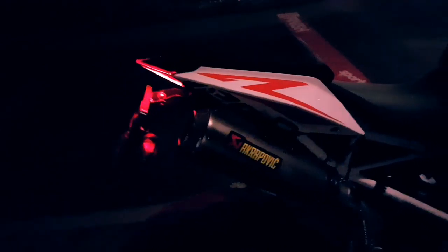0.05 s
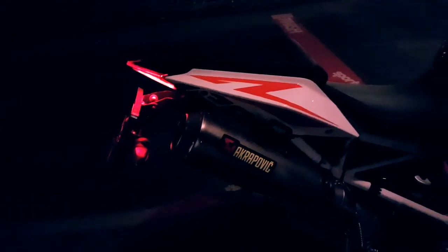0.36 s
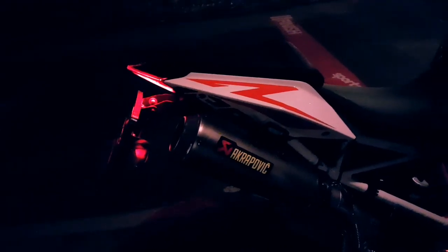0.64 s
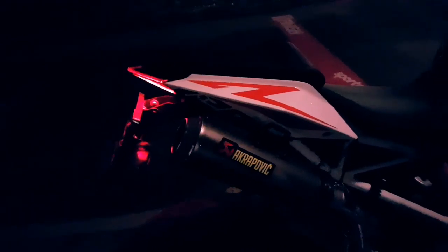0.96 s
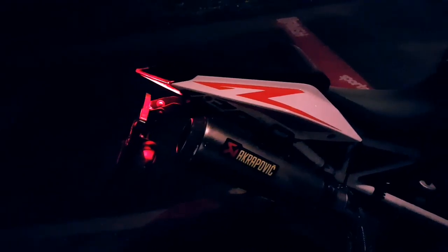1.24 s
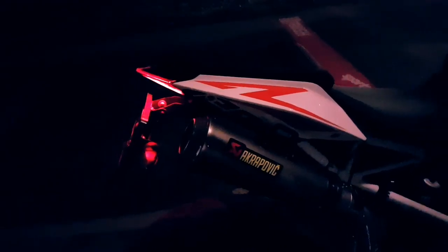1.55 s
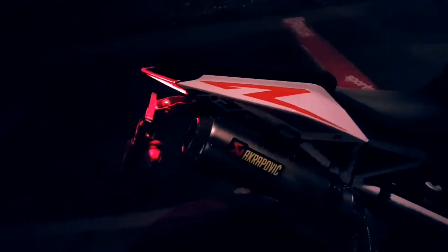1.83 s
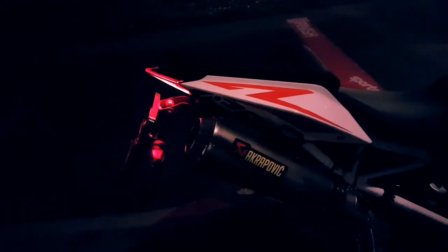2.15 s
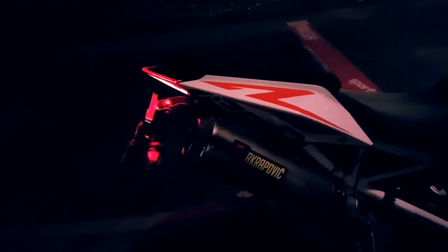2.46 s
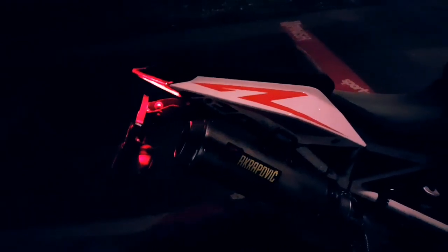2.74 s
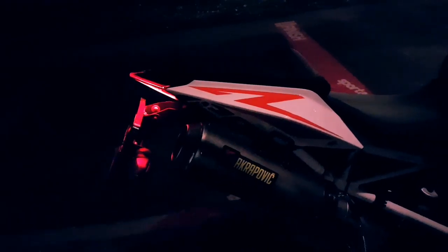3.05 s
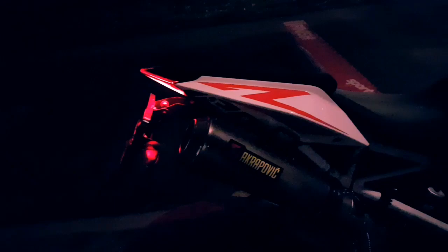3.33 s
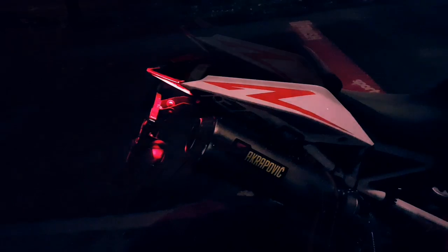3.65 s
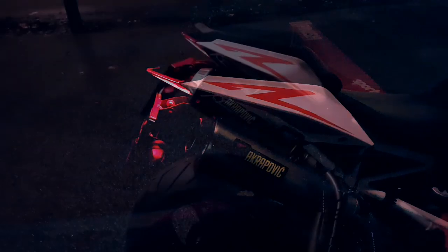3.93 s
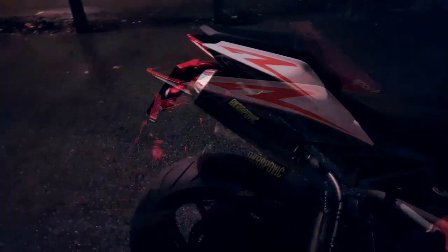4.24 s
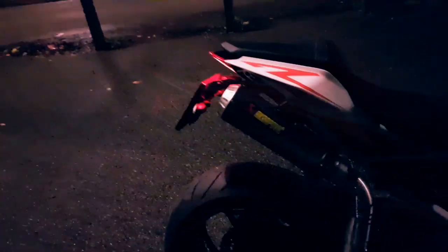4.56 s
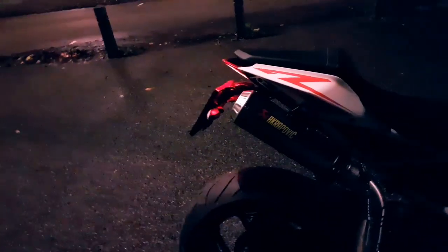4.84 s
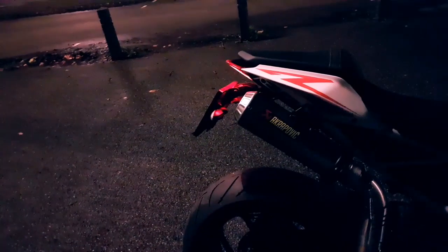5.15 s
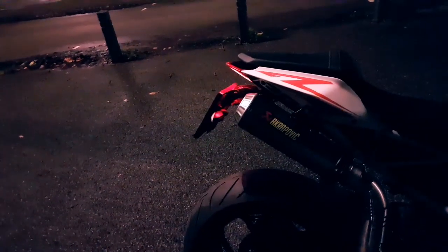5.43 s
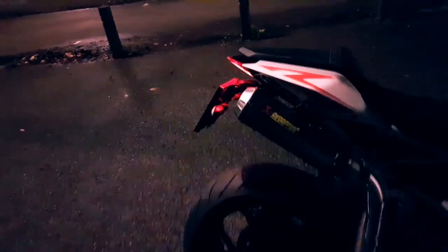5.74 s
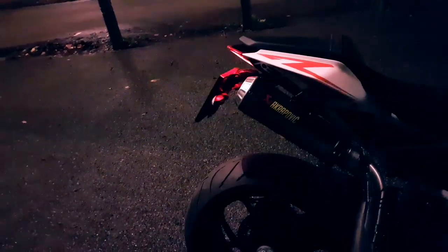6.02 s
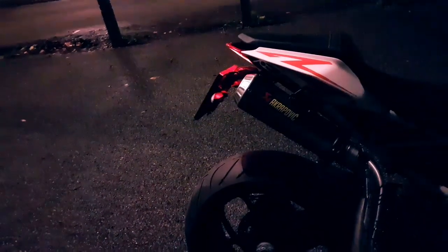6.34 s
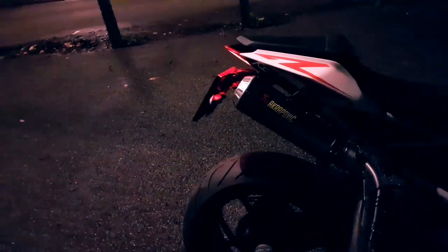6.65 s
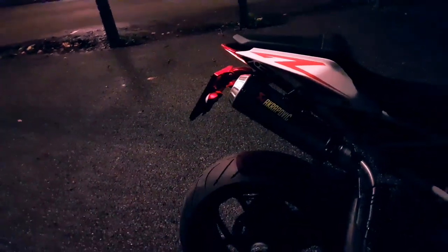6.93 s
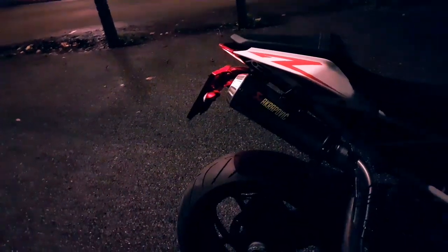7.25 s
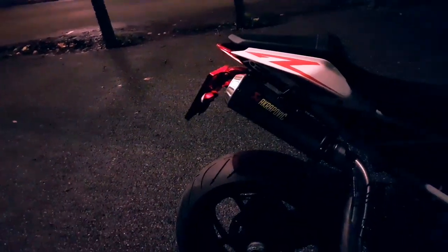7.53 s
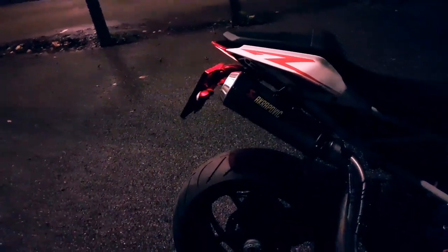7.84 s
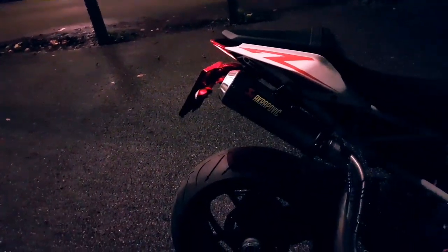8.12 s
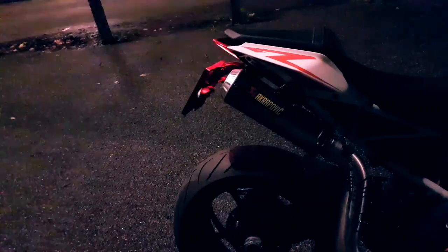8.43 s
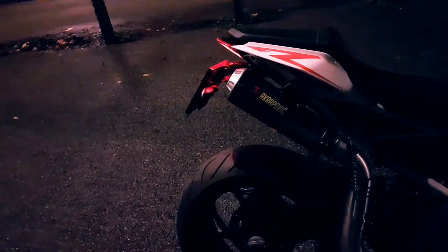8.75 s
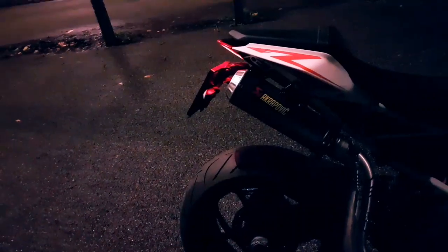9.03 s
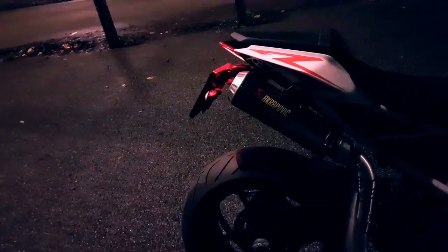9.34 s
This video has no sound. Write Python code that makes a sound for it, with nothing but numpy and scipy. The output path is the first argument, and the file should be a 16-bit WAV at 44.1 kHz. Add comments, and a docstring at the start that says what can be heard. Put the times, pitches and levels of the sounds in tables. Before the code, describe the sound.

Close outdoors, a motorcycle engine barks through repeated throttle blips, popping and thudding as it winds down between them.

```python
"""A parked motorcycle thuds at a lumpy idle and is at once blipped, nine times in all, outdoors and close by.
Four unevenly spaced exhaust pulses a cycle excite resonances that boom in the pipe and bark in the
silencer, while the turbulent gas jet rasps as the throttle opens. The engine sinks back with afterfire
pops, faint gear whine and valve clatter. Midway the microphone moves from beside the silencer to above
it. The recorder squashes the peaks."""
import sys
import numpy as np
from scipy import signal
from scipy.fft import rfft, irfft, next_fast_len
from scipy.io import wavfile
from scipy.ndimage import uniform_filter1d

SR = 44100
rng = np.random.default_rng(int(sys.argv[2]) if len(sys.argv) > 2 else 0)


def to_wav(s):
    """Save 16-bit WAV."""
    ch = np.atleast_2d(s).T  # columns
    pcm = np.round(np.clip(ch, -1, 1) * 32767)  # PCM
    wavfile.write(sys.argv[1], SR, pcm.astype(np.int16))


N = 418068
T = np.arange(N) / SR
MOVE_S = (4.3, 3.8)  # the microphone's change of position falls between these times


def undb(db):
    """Decibels to amplitude ratio."""
    return 10 ** (np.asarray(db) / 20)


def clicks(times, sizes):
    """Impulse train: linear interpolation shares each impulse between two neighbouring samples."""
    at = np.clip(times * SR, 0, N - 2)
    i = at.astype(int)
    return np.bincount(i, sizes * (1 - at + i), N) + np.bincount(i + 1, sizes * (at - i), N)


def butter(x, hz, kind, order=2):
    """Butterworth low-pass or high-pass."""
    return signal.sosfilt(signal.butter(order, hz, kind, fs=SR, output="sos"), x + 1e-18)


def zero_phase_low(x, hz, order):
    """Low-pass run forward and backward, so that its phase shifts cancel."""
    return signal.sosfiltfilt(signal.butter(order, hz, fs=SR, output="sos"), x)


def ring(x, modes):
    """Modal superposition: a sum of resonances, each a frequency in Hz, bandwidth in Hz and gain in dB."""
    return sum(undb(db) * signal.lfilter(*signal.iirpeak(hz, hz / width, fs=SR), x + 1e-18)
               for hz, width, db in modes)


def fade(x, seconds):
    """Exponential decay: every impulse gains a tail with this time constant."""
    return signal.lfilter([1], [1, -np.exp(-1 / (seconds * SR))], x + 1e-18)


def steady(x, seconds=0.16):
    """Normalisation to a running rms of 1, slow enough to keep single beats."""
    size = int(seconds * SR)
    power = uniform_filter1d(uniform_filter1d(np.atleast_2d(x ** 2).mean(0), size), size // 2)
    return x / np.sqrt(np.abs(power) + 1e-12)


def wander(hz):
    """Random fluctuation: low-passed noise with a standard deviation of 1."""
    slow = butter(rng.standard_normal(N // 16 + 2), 16 * hz, "low")
    return np.interp(np.arange(N) / 16, np.arange(len(slow)), slow / slow.std())


def scatter(x, t60, dull_hz):
    """Diffuse reflection: convolution with a decaying noise tail, different in each channel."""
    t = T[:SR]
    tail = butter(rng.standard_normal((2, SR)), dull_hz, "low", order=1)
    tail *= undb(-60 * t / t60) * (1 - np.exp(-t / (t60 / 20)))
    tail /= np.sqrt((tail ** 2).sum(1, keepdims=True) * SR / (np.pi * dull_hz))
    return signal.fftconvolve(np.atleast_2d(x), tail, axes=1)[:, :N]


def sway(x, sway_s=.0005, sway_hz=2.):
    """Varying path delay: reflections arrive earlier and later as the hand-held microphone moves."""
    return np.array([np.interp(T + sway_s * wander(sway_hz), T, channel) for channel in x])


# Glides of the gear whine. Each row: start and end in seconds, first and last pitch in Hz, level in dB.
GEAR_GLIDES = [(0, .16, 5300, 4500, -52), (.68, .87, 5800, 4400, -51), (1.3, 1.5, 6600, 5100, -52),
               (2.02, 2.43, 6500, 4300, -51), (3.3, 3.66, 6400, 4700, -49.5)]
# Tones of the gear train. Each row: frequency ratio to the main whine, relative level in dB.
GEAR_TONES = [(1, 3), (.76, -1.5), (.58, -5), (1.17, -7)]

def gears(waver=.02, waver_hz=180, flutter_db=8, flutter_hz=32):
    """Mesh tones fall as the gears slow; the uneven crank modulates each into rough chirps."""
    hz, gain = np.zeros((2, N))
    for start, end, high_hz, low_hz, db in GEAR_GLIDES:
        on = (T >= start) & (T < end)
        progress = (T[on] - start) / (end - start)
        hz[on] = high_hz + (low_hz - high_hz) * progress
        gain[on] = undb(db) * np.sqrt(np.sin(np.pi * progress))
    whine = 0
    for ratio, db in GEAR_TONES:
        phase = 2 * np.pi * np.cumsum(ratio * hz * (1 + waver * wander(waver_hz))) / SR
        contact = undb(db + flutter_db * np.clip(wander(flutter_hz), -2, 1))
        whine = whine + contact * np.sin([phase, phase + wander(flutter_hz)])
    return gain * whine


# Modes of the engine cases. Each row: frequency in Hz, bandwidth in Hz, gain in dB.
CASE_MODES = [(1560, 60, -1), (2080, 50, 0), (2480, 60, -1), (3000, 48, -1), (3700, 70, -3), (4400, 60, -4),
              (5700, 55, -5)]

def clatter(level_db=-47, uneven_db=6):
    """Impact excitation: each uneven knock of valves and chain rings the cases in its own mix of modes."""
    cycles = np.cumsum(engine()[0]) / SR
    at = np.arange(0, cycles[-1], 1 / 4)
    times = np.interp(at + rng.random(len(at)) / 4, cycles, T)
    count = len(CASE_MODES)
    strengths = undb(uneven_db * np.clip(rng.standard_normal((count, len(at))), -2, 2))
    knocks = [ring(clicks(times, sizes), [mode]) for sizes, mode in zip(strengths, CASE_MODES)]
    stereo_mix = rng.standard_normal((2, count)) / 3 + np.array([np.ones(count), (-1) ** np.arange(count)])
    return undb(level_db) * steady(stereo_mix @ np.array(knocks))


def detuned(x, modes, depth=.035, drift_hz=9):
    """Sound speed depends on temperature: hot and cool slugs of gas make the resonances drift in pitch."""
    tune = 1 + depth * np.clip(wander(drift_hz), -2, 2)
    clock = np.cumsum(tune / tune.mean()) / SR
    return np.interp(clock, T, ring(np.interp(T, clock, x), modes))


# Full idle beats that stand out. Each row: time in seconds, relative boom in dB, relative honk in dB.
IDLE_THUMPS = [(0.023, -6, -22), (0.155, 1.5, -17), (0.555, -0.5, -12), (0.652, -1, -18), (0.69, 5, -9.5),
               (0.759, -8, -29), (1.32, -1, -10), (1.408, -3, -18), (2.062, -3.0, -13), (2.2, 2, -14),
               (2.291, -3.0, -22), (2.331, -6, -25), (3.28, -2, -14), (3.318, 1.5, -8), (3.376, -7, -20),
               (3.417, 0, -12.5), (3.469, -4, -22), (3.496, -2, -23), (3.554, -1, -15), (3.741, -7, -27),
               (3.828, -8, -28), (3.971, -6, -24), (3.998, -1, -24), (4.024, 1.5, -16), (4.691, 1, -12),
               (4.731, -6.0, -13.5), (4.774, -2, -18.0), (4.879, -6, -21.0), (4.97, -3.0, -19),
               (5.081, -4.5, -26), (6.189, 5, -8.5), (6.21, -14, -26), (6.254, -2, -16), (7.36, -7, -14),
               (7.4, -1.5, -15), (7.441, 0, -17), (7.548, -7.0, -20), (7.654, -8, -35), (7.683, -2, -21),
               (7.705, 3.5, -12), (8.601, -2, -8), (8.717, -5.0, -14), (8.88, -2, -18), (8.911, -1, -10)]

def thumps(honk_db=2, soft_hz=480, honk_top_hz=750):
    """Impulse response to a full firing: a rounded boom in the pipe, a honk in chamber and silencer."""
    times, booms_db, honks_db = np.transpose(IDLE_THUMPS)
    impulse = clicks(T[:1], np.ones(1))
    modes = CHAMBER_MODES + SILENCER_ABOVE_MODES[:2]
    pipe_ring = lambda x: butter(ring(x, FAST_PIPE_MODES[1:] + SLOW_PIPE_MODES[1:]), soft_hz, "low")
    honk_band = lambda x: butter(butter(x, honk_top_hz, "low", order=4), 300, "high")
    boom = pipe_ring(clicks(times, -undb(booms_db))) / np.abs(pipe_ring(impulse)).max()
    honk = honk_band(detuned(clicks(times, -undb(honks_db)), modes))
    return boom + undb(honk_db) * honk / np.abs(honk_band(ring(impulse, modes))).max()


# Afterfire and hard single firings. Each row: time in seconds, relative crack and thump levels in dB.
AFTERFIRE = [(0.2209, -4, 8.5), (0.2633, 0, 7), (0.88, -26, 5), (0.902, -2.5, 7.5), (0.927, -1, 8),
             (0.944, -5, -20), (1.0698, -14, 1), (1.366, -12, 4.5), (1.5111, -2, 6.5), (1.664, -10.5, 5),
             (2.103, -35, 3.5), (2.125, -26.5, -2), (2.477, -34, 0), (2.5005, -12.5, 5), (2.533, -13, 7),
             (2.578, -13, 8), (3.245, -40, -8), (3.263, -33, -6), (3.305, -37, -1), (3.598, -26, 4),
             (3.619, -18, 10), (3.651, -17, 8.5), (3.694, -14.5, 5.5), (4.059, -19, -1), (4.083, -17, 3.5),
             (4.114, -18, -7), (4.136, -14.5, -1), (4.206, -20, -5), (4.28, -11, -1), (4.6257, -10, 5),
             (4.794, -14.5, 1.5), (4.8177, -15, -5), (5.108, -21, 3.5), (5.138, -17.5, -1), (6.06, -21, -1),
             (6.1653, -13, 2), (6.288, -24, -1), (6.31, -35, -12), (6.332, -13.5, 0), (6.625, -1, -5),
             (6.641, -2.5, 4), (7.2555, -5.5, 5), (7.266, -9, 0), (7.301, -7.5, -6), (7.7311, -13, 6),
             (8.545, 1, 3), (8.641, -19.5, -1), (8.9558, -12.5, 5), (9.279, -3, 7)]

def pops(crack_s=.0055, crack_db=-1, bark_db=2, thump_db=-1, crack_hz=3300, bite_db=-3):
    """Sudden combustion in the pipe: a crack of gas, a ring of chamber and silencer, and a low thump."""
    times, cracks_db, thumps_db = np.transpose(AFTERFIRE)
    bangs = clicks(times, undb(cracks_db))
    impulse = clicks(T[:1], np.ones(1))
    gas = fade(bangs, crack_s) * jet_noise()
    bite = ring(gas, [(2100, 1400, -2)])  # broad resonance of the tailpipe mouth
    crack = butter(gas + undb(bite_db) * bite, crack_hz, "low", order=1)
    body = lambda x: butter(ring(x, CHAMBER_MODES + SILENCER_ABOVE_MODES), 960, "low")
    bark = body(-bangs) / np.abs(body(impulse)).max()
    thump = butter(ring(clicks(times, -undb(thumps_db)), SLOW_PIPE_MODES), 900, "low", order=3)
    thump /= np.abs(ring(impulse, SLOW_PIPE_MODES)).max()
    return undb(crack_db) * crack + undb(bark_db) * bark + undb(thump_db) * thump


# Throttle blips. Each row: opening and shutting in seconds, top speed in cycles per second, run-down
# rate per second, then trims in dB for bark while open, rasp while open and bark while coasting.
BLIPS = [(.218, 0.31, 39.5, 2.36, 13.5, 14.5, -1.5), (.915, 1.03, 44.9, 2.34, 11, 14, -1.5),
         (1.508, 1.629, 52, 2.26, 10, 12.5, -2), (2.473, 2.83, 56.9, 2.08, 1, -3, -2.5),
         (3.989, 4.379, 43, 1.754, 1.5, -2.5, -3), (5.089, 5.419, 58.5, 1.56, 3.5, 0, -3.5),
         (6.265, 6.599, 81.4, 1.49, 3, 0, -3), (7.689, 8.0, 67.2, 1.56, 2.5, -1, -3.5),
         (8.901, 9.24, 76.2, 1.43, 2, -2, -2.5)]

def engine(idle_hz=11.2, climb_power=1.3, hang_s=.045, open_s=0.014, shut_s=0.039, shut_lag_s=0.002):
    """Rotational inertia: speed climbs under throttle, hangs, then decays exponentially towards idle."""
    speed, throttle, trim_db = np.full(N, idle_hz), np.zeros(N), np.zeros((3, N))
    for opens, shuts, top, fall, *trim in BLIPS:
        after = T >= opens
        t, start = T[after], np.interp(opens, T, speed)
        climb = start + (top - start) * ((t - opens) / (shuts - opens)) ** climb_power
        free = top * np.exp(-fall * np.maximum(t - shuts - hang_s, 0))
        run_down = np.sqrt(np.hypot(free ** 2, idle_hz ** 2))
        speed[after] = np.where(t < shuts, climb, run_down)
        opening = np.clip((t - opens) / open_s, 0, 1)
        throttle[after] = opening * np.clip((shuts + shut_lag_s - t) / shut_s, 0, 1)
        trim_db[:, after] = np.array(trim)[:, None]
    return speed, throttle, trim_db


def by_speed(table, speed):
    """Linear interpolation of a table's columns at the engine's speed."""
    hz, *columns = np.transpose(table)
    return np.array([np.interp(speed, hz, column) for column in columns])


# Exhaust, throttle shut. Each row: speed in cycles per second, relative boom, bark and rasp in dB.
SHUT_LEVELS = [(11.6, -12.5, -33, -40.5), (15.6, -14.5, -29.5, -41), (20.7, -14, -26.5, -36),
               (31.4, -10.5, -23, -35.5), (45, -6, -13, -26), (51.7, -7, -15, -27.5),
               (63.8, -10, -7, -20.5), (84.97, -13.5, -7.5, -19)]
# Exhaust, throttle open. Each row: speed in cycles per second, relative boom, bark and rasp in dB.
OPEN_LEVELS = [(12, -12.5, -23, -35.5), (20.8, -9, -23.5, -33.5), (38.5, -7.5, -14.5, -25),
               (51.3, -13, -13.5, -19), (68.4, -16.5, -8.5, -15), (85, -17, -22, -7)]

def effort(speed, throttle, trim_db, burble_hz=7, burble_db=3, above_rasp_db=0.5):
    """Source strength follows speed and load; coasting slowly, the bark fluctuates in a burble."""
    bark_db, rasp_db, coast_db = trim_db
    burble = burble_db * np.clip(wander(burble_hz), -2, 1) * np.clip((40 - speed) / 15, 0, 1)
    shut = by_speed(SHUT_LEVELS, speed) + np.outer([0, 1, 0], coast_db + burble)
    thinning_db = -0.62 * rasp_db  # a hard pull thins the bass
    wide = by_speed(OPEN_LEVELS, speed) + np.array([thinning_db, bark_db, rasp_db])
    boom, bark, rasp = (1 - throttle) * shut + throttle * wide
    return undb(boom), undb(bark), undb(rasp + above_rasp_db * np.interp(T, MOVE_S, [0, 1]))


# Pulses of one four-stroke cycle. Each row: place as a fraction of the cycle, size in dB,
# size of the steep front in dB, lag of that front in seconds.
CYCLE_PULSES = [(0, -4, -7, .0007), (.24, -.5, .5, .0003), (.46, -4, -6, .0002), (.665, .5, .5, 0)]

def firings(speed, run_db=1.5, idle_db=1.0, load_db=0.7,
            run_jitter=0.004, idle_jitter=0.015, load_jitter=0.022):
    """Quasi-periodic excitation: pulses and their fronts scatter most at idle and under load."""
    cycles = np.cumsum(speed) / SR
    place, size_db, front_db, lag = np.tile(np.transpose(CYCLE_PULSES), int(cycles[-1]) + 1)
    at = np.arange(len(place)) // len(CYCLE_PULSES) + place
    time_draw, size_draw, front_draw = np.clip(rng.standard_normal((len(at), 3)).T, -2, 2)
    idle = np.interp(at, cycles, np.clip((34 - speed) / 8, 0, 1))
    load = np.interp(at, cycles, np.clip(np.gradient(speed) * SR / 150, 0, 1))  # while speed climbs
    times = np.interp(at + time_draw * (run_jitter + idle * idle_jitter + load * load_jitter), cycles, T)
    size = undb(size_db + size_draw * (run_db + idle * idle_db + load * load_db)) * (at < cycles[-1])
    return clicks(times, -size), clicks(times + lag, -size * undb(front_db + front_draw))


# Weak or missed firings. Each row: centre in seconds, length in seconds, level change in dB.
MISFIRES = [(0.14, 0.038, -5.5), (.848, 0.11, -6.5), (1.501, 0.005, -11), (2.261, 0.057, -10.5),
            (5.055, 0.084, -3), (6.69, 0.06, 0), (8.85, 0.042, 0.5)]

def stumbles(pop_s=0.015, pop_db=-5, cut_after_s=0.034, cut_s=0.029, cut_db=-4, thump_s=0.025, thump_db=-6):
    """Amplitude modulation: dips at misfires, at pops and thumps, and just after the throttle shuts."""
    dips = list(MISFIRES) + [(s - pop_s / 4, pop_s, pop_db) for s, *_ in AFTERFIRE]
    dips += [(shuts + cut_after_s, cut_s, cut_db) for _, shuts, *_ in BLIPS]
    dips += [(s, thump_s, thump_db) for s, *_ in IDLE_THUMPS]
    t = T[::40]
    gain_db = sum(db * np.exp(-(2 * (t - s) / length) ** 4) for s, length, db in dips)
    return undb(np.interp(T, t, gain_db))


# Spectrum of the gas jet at the outlet. Each row: frequency in Hz, relative spectral density in dB.
JET_SPECTRUM = [(300, -43), (900, 3.5), (2200, -4), (3200, -9), (5000, -11.5), (7400, -10.5), (9200, -23),
                (12500, -19.5), (15000, -49)]

def jet_colour(x):
    """Spectral shaping: gives a sound the colour of the gas jet, at rms 1."""
    hz, db = np.transpose(JET_SPECTRUM)
    size = next_fast_len(N)
    gain = undb(np.interp(np.log(np.fft.rfftfreq(size, 1 / SR) + 1), np.log(hz), db))
    shaped = irfft(rfft(x, size) * gain, size)[:, :N]
    return shaped / shaped.std()


def jet_noise(shared_power=0.14):
    """Turbulence at the outlet radiates broadband noise, partly coherent between the channels."""
    return jet_colour(rng.standard_normal((2, N)) + np.sqrt(shared_power) * rng.standard_normal(N))


def snarl(fronts, t60=.026, low_hz=1400, high_hz=3400):
    """Nonlinear emphasis: the hardest fronts break into short, ragged bursts at the outlet."""
    burst = sway(scatter(-fronts * np.sqrt(np.abs(fronts)), t60, high_hz))
    return steady(butter(butter(burst, low_hz, "high"), high_hz, "low", order=3))


def gas_rasp(fronts, note, speed, level, gain_db=3.0, hiss=0.26, puff_s=0.03, surge=0.038, shock_db=-2,
             ragged_db=1.38, ragged_hz=45, treble_pivot_db=-29, treble_power=0.3):
    """Pulsed jet noise: each front throws out a puff of gas, and fast pulses steepen into shocks."""
    fast = np.clip((speed - 20) / 30, 0, 1)
    outflow = surge * fast * np.maximum(-steady(note), 0) ** 2  # gas tears out with each swing of the note
    puffs = steady((steady(fade(-fronts, puff_s)) + hiss + outflow) * jet_noise())
    shocks = fast * steady(jet_colour(sway(scatter(fronts, t60=.04, dull_hz=18000))))
    ragged = undb(ragged_db * np.clip(wander(ragged_hz), -2, 2))  # the jet tears unevenly
    rasp = undb(gain_db) * ragged * level * steady(puffs + undb(shock_db) * shocks + fast * snarl(fronts))
    # the top treble of the hiss dulls in quiet moments and opens in loud ones
    dull = zero_phase_low(rasp, 8800, order=4)
    return dull + (rasp - dull) * (level / undb(treble_pivot_db)) ** treble_power


# Modes of the silencer chamber. Each row: frequency in Hz, bandwidth in Hz, gain in dB.
CHAMBER_MODES = [(404, 84, 6), (444, 29, 5)]

def chamber(x, beside_db=1.5):
    """Cavity resonance: the chamber honks, lower and broader beside the silencer than above it."""
    honk, above = detuned(x, CHAMBER_MODES), np.interp(T, MOVE_S, [0, 1])
    from_beside = steady(butter(butter(honk, 335, "high", order=5), 350, "low", order=4))
    from_above = steady(butter(butter(honk, 444, "high", order=5), 372, "low", order=3))
    return (1 - above) * undb(beside_db) * from_beside + above * from_above


# Silencer modes heard from beside it. Each row: frequency in Hz, bandwidth in Hz, gain in dB.
SILENCER_BESIDE_MODES = [(592, 55, 11), (790, 90, -2), (1650, 260, -10), (2100, 260, -7)]
# Silencer modes heard from above it. Each row: frequency in Hz, bandwidth in Hz, gain in dB.
SILENCER_ABOVE_MODES = [(658, 79, 15), (734, 43, 11.5), (886, 86, 6), (1190, 130, -1), (1940, 140, -4.5)]

def silencer(fronts, speed, rounded_hz=640, echo_db=-5):
    """Resonance and reflection: fronts, rounder at idle, ring the silencer and bounce off road and bike."""
    above = np.interp(T, MOVE_S, [0, 1])
    bark = (1 - above) * detuned(fronts, SILENCER_BESIDE_MODES)
    bark += above * detuned(fronts, SILENCER_ABOVE_MODES)
    bark = butter(butter(bark, 490, "high", order=3), 2600, "low")
    steep = np.clip((speed - 19) / 33, 0.04, 1)
    bark = steep * bark + (1 - steep) * zero_phase_low(bark, rounded_hz, order=2)
    return steady(bark + undb(echo_db) * sway(scatter(bark, t60=0.06, dull_hz=9000)))


# Pipe modes with little gas flowing. Each row: frequency in Hz, bandwidth in Hz, gain in dB.
SLOW_PIPE_MODES = [(56, 28, -15), (156, 24, 0), (222, 32, -2)]
# Pipe modes damped by a fast stream of gas. Each row: frequency in Hz, bandwidth in Hz, gain in dB.
FAST_PIPE_MODES = [(66, 34, -5), (152, 85, 7), (205, 36, 2.5), (258, 80, 5)]

def pipe(pulses, speed, soft_hz=280, hard_hz=305, bass_hz=128, beside_db=7, above_db=1):
    """Standing waves: broad pulses set the pipe booming at idle; at speed the flow damps its modes."""
    flow = np.clip((speed - 19) / 15, 0, 1)
    slow = steady(butter(ring(pulses, SLOW_PIPE_MODES), soft_hz, "low", order=3))
    fast = steady(butter(ring(pulses, FAST_PIPE_MODES), hard_hz, "low", order=6))
    boom = steady(butter((1 - flow) * slow + flow * fast, 41.5, "high", order=3))
    bass_gain = undb(np.interp(T, MOVE_S, [beside_db, above_db]))  # more deep bass beside the silencer
    return boom + (bass_gain - 1) * zero_phase_low(boom, bass_hz, order=3)


def exhaust(honk_db=0.5, jet_pan_db=-2.5):
    """Source and filter: one pulse train drives the pipe, the chamber, the silencer and the gas jet."""
    speed, throttle, trim_db = engine()
    boom_level, bark_level, rasp_level = effort(speed, throttle, trim_db)
    pulses, fronts = firings(speed)
    boom = boom_level * pipe(pulses, speed)
    honk = undb(honk_db) * boom_level ** 0.51 * bark_level ** 0.58 * chamber(fronts + 0.0054 * pulses)
    note = boom + honk + bark_level * silencer(fronts, speed)
    rasp = gas_rasp(fronts, note, speed, rasp_level)
    dips = stumbles()
    return note * dips + rasp * np.sqrt(dips) * undb(np.array([[jet_pan_db], [-jet_pan_db]]) / 2)


def scene(echo_db=-16.0):
    """Superposition: the bike's direct sound, weak reflections from its surroundings, and the gears."""
    bike = exhaust() + pops() + thumps() + clatter()
    return bike + undb(echo_db) * sway(scatter(bike, t60=0.18, dull_hz=5700)) + gears()


def record(dry, drive_db=1.5, balance_db=-1.33, knee=2.2, dropout_s=(3.709, 3.727), top_hz=13200):
    """Soft saturation rounds the peaks; the sound drops out for an instant, and the top is cut."""
    x = dry * undb(drive_db + np.array([[balance_db], [-balance_db]]) / 2)
    x = x / (1 + np.abs(x / 1.038) ** knee) ** (1 / knee)
    gap = uniform_filter1d(1. * ((T > dropout_s[0]) & (T < dropout_s[1])), size=60)
    return signal.sosfilt(signal.ellip(8, .2, 70, top_hz, fs=SR, output="sos"), x * (1 - .98 * gap))


dry = scene()
out = record(dry)
to_wav(out)
```